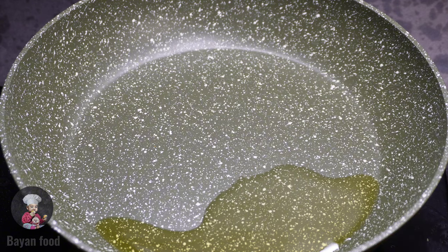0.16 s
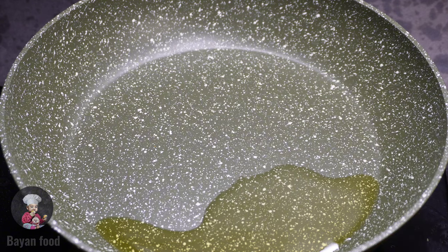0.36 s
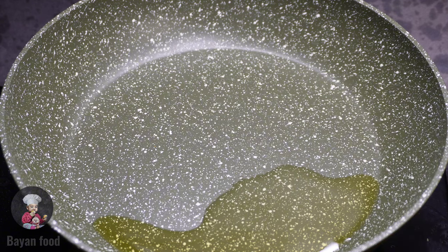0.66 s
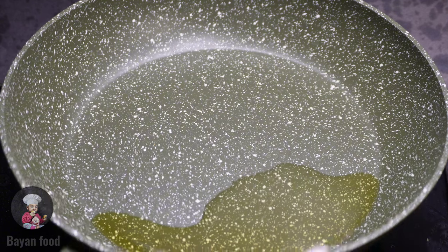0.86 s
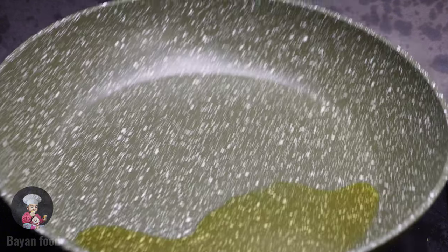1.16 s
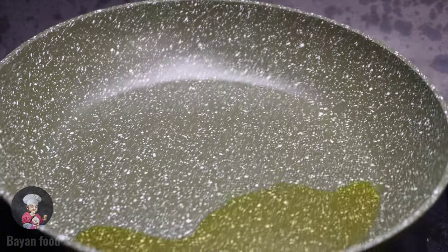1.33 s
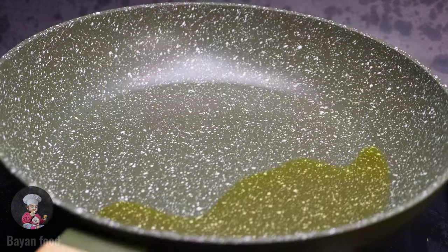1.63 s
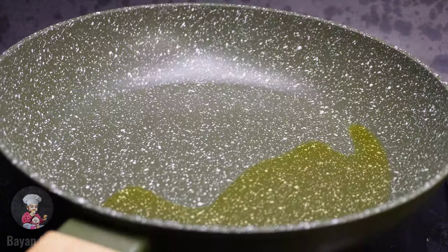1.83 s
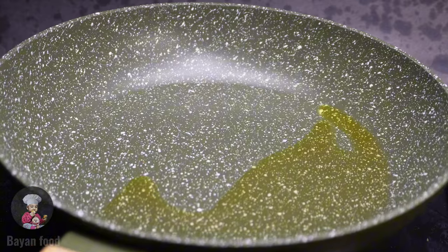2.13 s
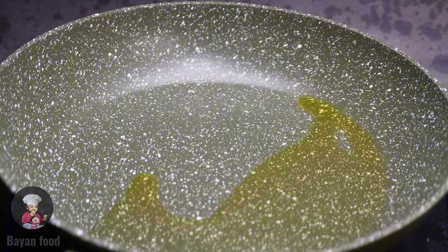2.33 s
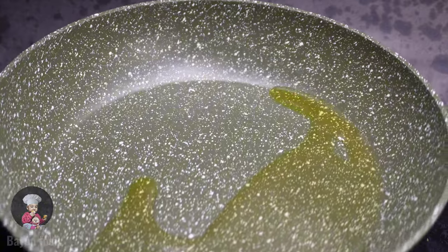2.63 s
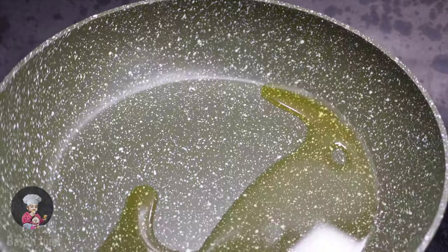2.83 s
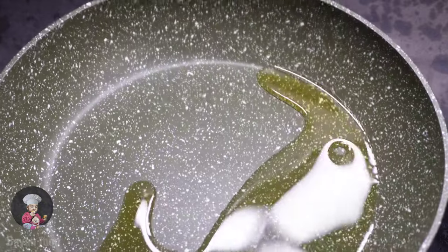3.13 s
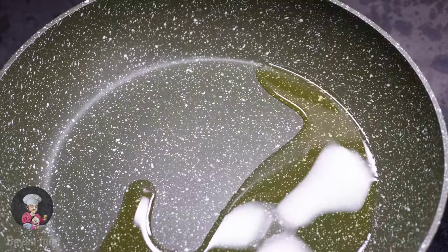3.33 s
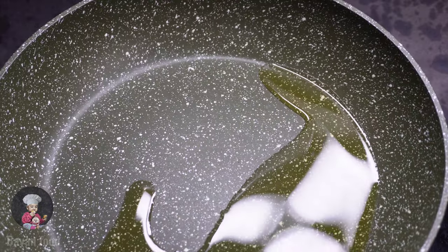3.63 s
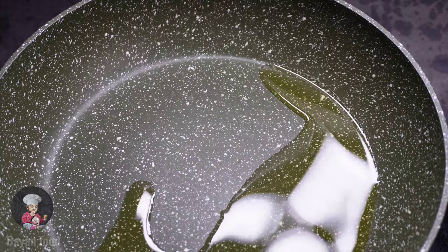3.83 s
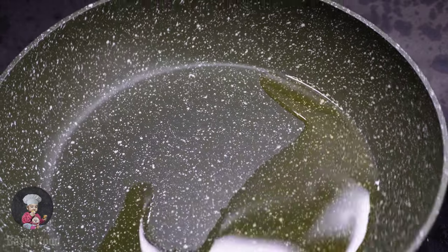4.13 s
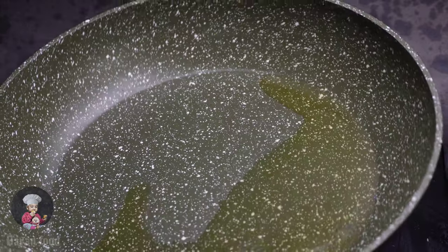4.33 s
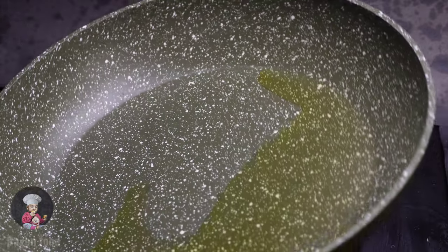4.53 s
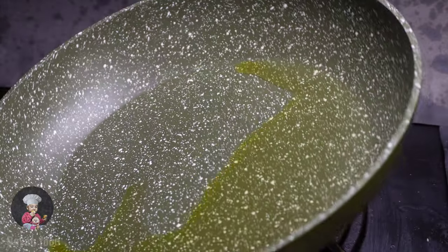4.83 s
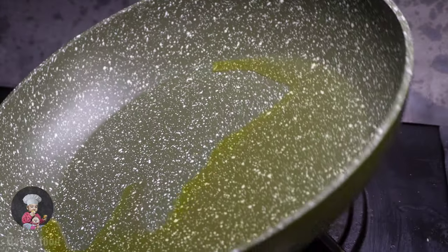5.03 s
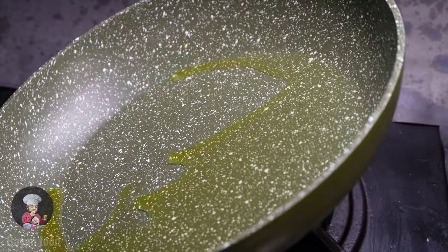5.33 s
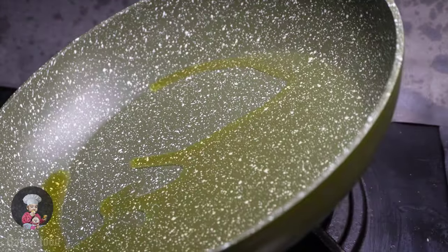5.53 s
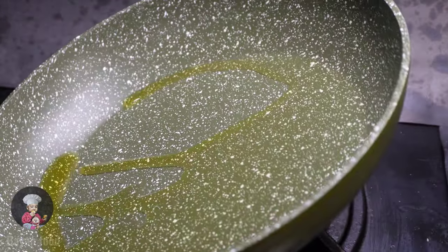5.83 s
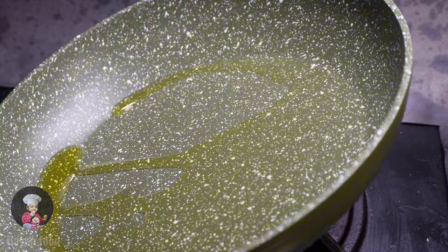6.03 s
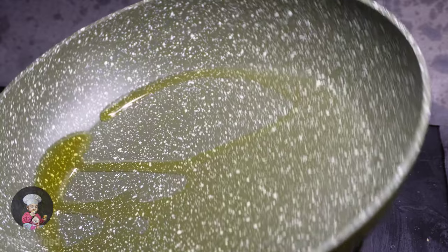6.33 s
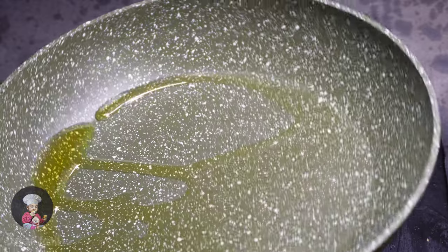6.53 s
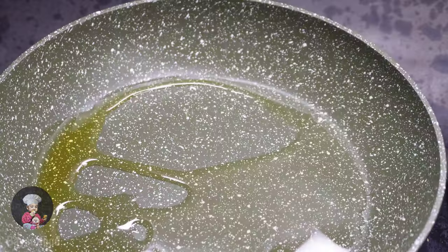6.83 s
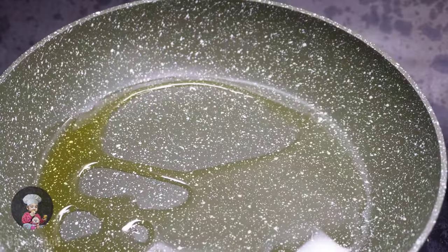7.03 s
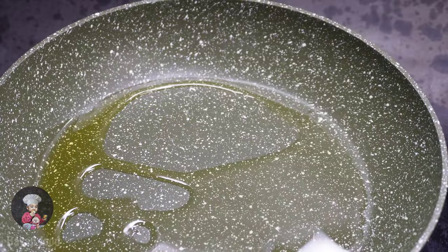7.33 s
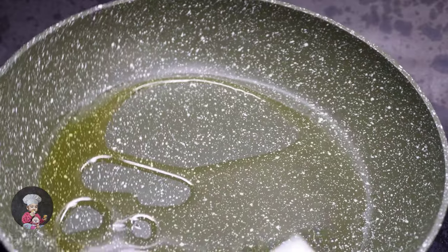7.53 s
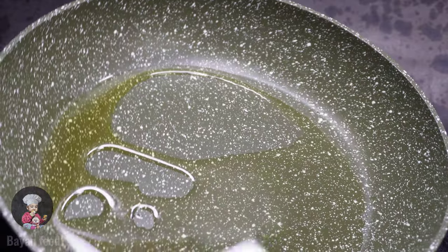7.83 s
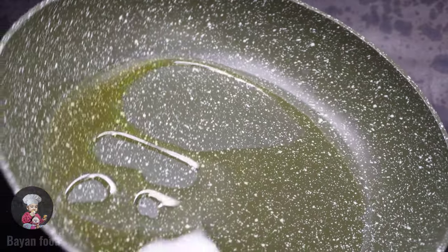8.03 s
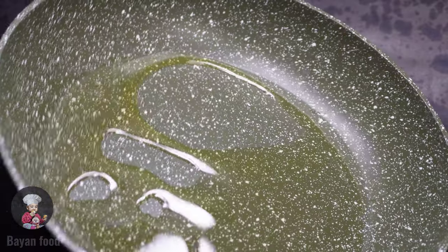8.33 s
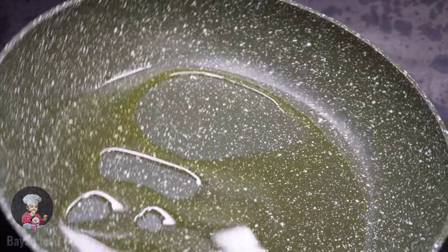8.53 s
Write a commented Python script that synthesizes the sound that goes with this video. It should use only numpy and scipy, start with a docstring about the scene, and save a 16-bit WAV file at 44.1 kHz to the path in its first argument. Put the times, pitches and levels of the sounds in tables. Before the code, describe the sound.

A gas burner hisses throughout in a small kitchen, with a low fluttering flame rumble, a little quieter during the first second, and a very faint hum. In the first 0.4 s, several light hard clicks sound over a dull hand rub. Around 0.9-1.3 s a frying pan drags across the iron grate with a dense metallic scrape and a few knocks as it is lifted; the hiss shifts slightly. At 2.9 s it lands with a strong double clank, short ringing and grate rattle, followed by duller knocks at 3.1 and 3.2 s. Tiny clicks come at 3.6-4 s, a soft low knock at 4.4 s, then a lift with faint soft rubbing around 5-6 s. At 6.8 s the pan clatters down brightly in rapid bounces with a slight scrape. A single knock follows at 7.5 s, and a thin high whistle briefly appears around 8-8.5 s. Close, with short wall echoes.

```python
"""Light clicks and a dull rub of the hand come first, over a hissing, rumbling gas burner in a small kitchen.
Then a frying pan with oil is dragged over the iron grate, lifted, tilted and set down twice.
Each contact rings the pan, as fading sine tones, and rattles the grate and hob top, as fading noise.
The drag is a dense rain of tiny jolts through the same pan tones; gas, flame and rubbing are filtered noise.
A faint hum lies beneath, and a thin whistle comes once near the end."""
import sys
import numpy as np
from scipy import signal
from scipy.fft import rfft, irfft, next_fast_len
from scipy.io import wavfile
from scipy.ndimage import map_coordinates

SR = 44100
rng = np.random.default_rng(int(sys.argv[2]) if len(sys.argv) > 2 else 0)


def to_wav(sig):
    """Store sig (one row per channel, or 1-D mono) as 16-bit WAV at the path in sys.argv[1].

    Samples outside -1..1 are clipped; the rate is SR.
    """
    pcm = np.clip(np.atleast_2d(sig), -1, 1) * 32767
    pcm = np.round(pcm).astype(np.int16)
    wavfile.write(sys.argv[1], SR, pcm.T)  # frames by channels


N = 382347  # length in samples
T = np.arange(N) / SR  # time in s
RING_T = T[:SR // 2]  # the half second in which a ring dies away


def undb(db):
    """Turn dB into a plain gain."""
    return 10 ** (np.asarray(db) / 20)


def unit(x):
    """Scale to rms 1."""
    return x / np.sqrt(np.mean(x ** 2))


def colour(x, gain):
    """Filter by a gain that is a function of frequency."""
    size = next_fast_len(x.shape[-1])
    hz = np.arange(size // 2 + 1) * SR / size + 0.00092  # just above 0, so its logarithm exists
    return irfft(rfft(x, size) * gain(hz), size)[..., :x.shape[-1]]


def along(hz, table, axis=1):
    """Read a column of a table on a log-frequency axis."""
    table = np.array(table)
    return np.interp(np.log(hz), np.log(table[:, 0]), table[:, axis])


def butter(x, hz, kind, order=2):
    """Smooth low, high or band filter."""
    corner = np.clip(hz, 10, .48 * SR)
    return signal.sosfilt(signal.butter(order, corner, kind, fs=SR, output="sos"), x)


def band(x, hz, width_hz):
    """One resonance, gain 1 at its centre."""
    return signal.lfilter(*signal.iirpeak(hz, hz / width_hz, fs=SR), x)


def walk(rate_hz):
    """Random wandering with spread 1; a higher rate wanders faster."""
    return unit(colour(rng.standard_normal(N), lambda f: np.exp(-(f / rate_hz) ** 2)))


SWELL_DB = 32  # rise over one attack time, fall over one release time


def swell(t, start, attack, hold, release):
    """Gain that rises and falls evenly in dB around a hold at 1."""
    short_of_top = np.maximum((start + attack - t) / attack, (t - start - attack - hold) / release)
    return undb(-SWELL_DB * np.clip(short_of_top, 0, 10))


def dying_noise(table):
    """Countless overlapping rings: third-octave bands, each with its own decay; energy 1."""
    out = 0
    for hz in 40 * 2 ** (np.arange(27) / 3):
        edges_hz = hz * 2 ** (np.array([-1, 1]) / 6)
        ring = butter(rng.standard_normal(len(RING_T)), edges_hz, "bandpass")
        fall_db = 60 * RING_T / along(hz, table, axis=2)
        out = out + ring * undb(along(hz, table) - fall_db)
    return out / np.linalg.norm(out)


def add(out, s, sound, db):
    """Mix in a blow whose first 20 ms have the given level."""
    start = int(s * SR)
    sound = sound * undb(db) / np.sqrt(np.mean(sound[:SR // 50] ** 2))
    out[start:start + len(sound)] += sound[:N - start]


# how much left and right differ, before each source's own side_db: pitch_hz, side_minus_mid_db
STEREO_WIDTH = [(60, -31), (200, -19.5), (700, -12.5), (2400, -12.5), (4400, -12), (8000, -6.5),
                (15000, -3)]


def pair(mid, side, side_db):
    """Left and right from a shared sound and a difference added to one and taken from the other."""
    side = colour(side, lambda f: undb(along(f, STEREO_WIDTH) + side_db))
    return np.array([mid + side, mid - side])


def spread(x, side_db):
    """Two close microphones: near reflections reach them differently, most of all in the treble."""
    # a 3.5 ms delay whose phase ripples with pitch
    echoes = colour(x, lambda f: np.exp(-2j * np.pi * f * .0035 + 2j * np.sin(f / 130)))
    return pair(x, echoes, side_db)


# echo of the kitchen walls, levels relative: pitch_hz, level_db_per_hz, t60_s (time to fall by 60 dB)
KITCHEN_WALLS = [(60, -5, 0.2), (400, 7, 0.38), (1480, 2.5, 0.52), (3000, -1, 0.5), (7000, 3, 0.25),
                 (15000, 0.5, 0.72)]


def kitchen_walls(sent):
    """Many wall reflections blur into a fading noise that builds up within a few milliseconds."""
    build_up = 1 - np.exp(-RING_T / 0.0013)
    return signal.fftconvolve(sent, dying_noise(KITCHEN_WALLS) * build_up)[:N]


# steady low tones: pitch_hz, level_db (rms)
HUM_TONES = [(48.4, -64), (96.9, -58.5)]


def hum():
    """Low sine tones whose phase wavers a little."""
    tones = 0
    for hz, db in HUM_TONES:
        phase = 2 * np.pi * hz * T + 0.097 * walk(4.7)
        tones = tones + undb(db) * np.sqrt(2) * np.sin(phase)
    return tones


# when a thin whistle comes and goes in the gas flow: start_s, attack_s, hold_s, release_s
WHISTLE_TIMING = (7.9, .17, .35, .13)


def whistle(hz=7750, width_hz=90, db=-67):
    """One narrow, airy resonance of the burner, driven by noise."""
    air = band(band(rng.standard_normal(N), hz, width_hz), hz, width_hz)
    return unit(air) * undb(db) * swell(T, *WHISTLE_TIMING)


LIFT_MOVE_S = 0.56  # time to raise or lower the pan; the opening balance changes as gradually


def raised(start, end):
    """0 to 1 and back in smooth moves; halfway at start and end."""
    return np.clip(np.minimum(T - start, end - T) / LIFT_MOVE_S + .5, 0, 1)


# gas hiss resonances, levels relative: pitch_hz, width_hz (nominal, for each of two passes), level_db
GAS_JET = [(1477, 129, -1.5), (3103, 174, 1), (3944, 390, -12), (4680, 38, -14.5), (5267, 139, -6),
           (6026, 97, -9.5), (6820, 42, -13), (7210, 300, -21), (7800, 300, -34), (9020, 190, -22.5),
           (10800, 310, -28.5), (11750, 120, -32.5), (13520, 130, -37)]
# flame noise, levels relative: pitch_hz, level_db_per_hz
FLAME_ROAR = [(20, -22), (36, -4), (55, 5), (80, -5.5), (160, 3), (290, -1.5), (480, -9.5), (1100, -13.5),
              (1700, -13.5), (2500, -22), (4500, -27), (7000, -28.5), (10000, -36.5), (15500, -42.5)]
# the pan is raised off the burner: start_s, end_s, extra_db of the second hiss resonance
PAN_LIFTS = [(1.103, 2.855, 5.5), (4.686, 6.8, 2)]
# a raised pan weakens the lowest resonance and frees the flame
LIFT_LOW_RING_DB, LIFT_FLAME_DB = -2.5, 2
# at first the flame noise and lowest hiss resonance are quieter, the second slightly louder
OPENING_UNTIL_S, OPENING_FLAME_DB, OPENING_LOW_RING_DB, OPENING_MAIN_RING_DB = 0.98, -6, -5.5, 2


def burner(hiss_db=-49, main_db=-6, upper_db=-1.5, roar_db=-48.5, flutter_db=1.2):
    """Gas hisses through the burner's resonances and the flame rumbles; lifting the pan alters both."""
    lifted = sum(raised(start, end) for start, end, _ in PAN_LIFTS)
    opening = 1 - raised(OPENING_UNTIL_S, np.inf)
    low_ring_db = LIFT_LOW_RING_DB * lifted + OPENING_LOW_RING_DB * opening
    lift_extra_db = sum(db * raised(start, end) for start, end, db in PAN_LIFTS)
    main_ring_db = main_db + lift_extra_db + OPENING_MAIN_RING_DB * opening
    flame_db = LIFT_FLAME_DB * lifted + OPENING_FLAME_DB * opening
    gas = rng.standard_normal(N)
    rings = []
    for hz, width, db in GAS_JET:
        rings.append(undb(db) * band(band(gas, hz, 1.04 * width), hz, 1.09 * width))
    upper_gain = undb(upper_db + 0.95 * walk(1.0))
    hiss = undb(low_ring_db) * rings[0] + undb(main_ring_db) * rings[1] + upper_gain * sum(rings[2:])
    # the resonances wander slightly in pitch
    positions = np.cumsum(1 + .005 * walk(.8))
    hiss = map_coordinates(hiss, [positions], order=3, mode="reflect")
    roar = unit(colour(rng.standard_normal(N), lambda f: undb(along(f, FLAME_ROAR))))
    # the low flame noise flutters
    flame_gain = undb(flame_db + flutter_db * walk(6.5))
    roar = roar + (flame_gain - 1) * band(roar, 246, 610)
    return hiss / np.std(sum(rings)) * undb(hiss_db) + undb(roar_db) * roar


# hand rubbing and shifting on the handle: start_s, attack_s, hold_s, release_s, level_db, centre_hz
HANDLE_RUBS = [(0, .17, 0.13, 0.94, -46.5, 120), (.38, 0.166, 0.028, 0.9, -56.5, 6200),
               (5.0, 0.65, 0.059, 0.57, -52, 3380)]


def rubbing(width=0.64, uneven_db=2.5):
    """Faint uneven friction on the handle: a dull rumble or a soft hiss that swells and fades."""
    noise = rng.standard_normal(N)
    strokes = 0
    for *timing, db, hz in HANDLE_RUBS:
        friction = band(band(noise, hz, width * hz), hz, width * hz)
        strokes = strokes + unit(friction) * undb(db) * swell(T, *timing)
    return strokes * undb(uneven_db * walk(25))


# a small hard part, levels relative: pitch_hz, level_db_per_hz, t60_s (before the click's own damping)
HARD_SNAP = [(100, 21, 0.11), (490, 5, 0.35), (1404, -3, 0.23), (2960, 11, 0.053), (4970, 3, 0.13),
             (7800, 2, 0.056), (15200, -12.5, 0.091)]
# its resonances, added on top: pitch_hz, width_hz, added_db
HARD_SNAP_RINGS = [(486, 140, 12.5), (1160, 290, 9.5), (1440, 230, 14), (2433, 460, 1), (3130, 180, 2.5),
                   (4040, 120, -10), (6250, 2200, -1)]
# light handling clicks: start_s, level_db, centre_hz, damping_s (time to fall to about a third)
HANDLING_CLICKS = [(.029, -44, 2500, 0.11), (0.147, -40, 4000, 0.046), (0.162, -22, 2030, 0.17),
                   (.260, -35, 5350, .08), (.372, -32.5, 5230, 0.038), (0.3798, -27.5, 2270, 0.32),
                   (1.315, -48, 3500, 0.0108), (3.601, -49, 3260, 0.033), (3.803, -51, 4100, 0.0037),
                   (3.863, -46.5, 4630, 0.0043), (3.955, -33, 3300, 0.02), (6.999, -51, 4970, 0.0059)]
CLICK_SPAN = 1.8  # a click reaches this factor below and above its centre


def clicks():
    """Small hard snaps: quickly damped noise with a few short resonances."""
    out = np.zeros(N)
    for s, db, centre_hz, damping_s in HANDLING_CLICKS:
        snap = dying_noise(HARD_SNAP) * np.exp(-RING_T / damping_s)
        snap = snap + sum(undb(ring_db) * band(snap, hz, width) for hz, width, ring_db in HARD_SNAP_RINGS)
        snap = butter(snap, centre_hz / CLICK_SPAN, "highpass")
        add(out, s, butter(snap, centre_hz * CLICK_SPAN, "lowpass", order=1), db)
    return out


# tones of the pan resting on the hob, levels relative: pitch_hz, struck_db, rubbed_db,
# t60_s (before each contact's length share)
PAN_MODES = [(107, -12.5, -18, 0.21), (151.4, -9.5, -8, 0.39), (196, -17.5, -15, 0.66),
             (285.7, -9.5, -6.5, 0.38), (380, -15.5, -17, 0.26), (535, -11.5, -15, 0.2),
             (659, -15, 4, 0.158), (741, -10.5, 0, 0.22), (796, -10.5, 0.5, 0.061), (924, -4, 10.5, 0.1),
             (953, -1, -5, 0.12), (1048, -2, -6, 0.16), (1227, -3.5, -19, 0.29), (1270, -45, -9, 0.1),
             (1434, -0.5, -9, 0.18), (1553, -10, -10, 0.27), (1933, -1, 8.5, 0.14), (1972, -3.5, -5, 0.27),
             (2094, -2, -21, 0.187), (2468, -10, -5, 0.2), (2867, -1, 4.5, 0.11), (3040, -14, -31, 0.23),
             (3996, -17, -4, 0.22), (4490, -11.5, -13, 0.24), (5200, -7, -8, 0.29), (5530, 2.5, -3, 0.11),
             (5770, -19, -10, 0.078), (6420, -12, -6, 0.16), (7100, -18, -18, .16),
             (7570, -30, -10.5, 0.17)]


def pan_modes(db, length, scatter_db, detune):
    """The pan's modes after one tap, energy 1; every contact point weights them anew."""
    hz, _, _, t60 = np.transpose(PAN_MODES)[:, :, None]
    size, shift, sign = rng.standard_normal((len(hz), 3)).T[:, :, None]
    decay = undb(db[:, None] + scatter_db * size - 60 * RING_T / (t60 * length))
    tones = np.sin(2 * np.pi * hz * (1 + detune * shift) * RING_T)
    modes = np.sum(np.sign(sign) * decay * tones, axis=0)
    return modes / np.linalg.norm(modes)


# grit between pan and grate, levels relative: pitch_hz, level_db_per_hz
GRIT = [(40, -40), (85, -25), (150, -16), (280, 0), (450, -2), (700, 4.5), (1400, 0), (2200, -11),
        (4500, -11.5), (7500, -21.5), (10000, -24), (15000, -51)]
# pan sliding on the grate: start_s, attack_s, hold_s, release_s, level_db (before the treble change),
# treble_db, grit_db (against the ring)
PAN_DRAGS = [(.915, .19, 0.0958, 0.13, -20.5, -2.5, -1.5), (6.834, 0.037, 0.082, 0.084, -46, 6.5, 6.5)]
SAG_OCTAVES_PER_S = .15  # the rings sink as the support points move


def drags(slip_rate=2200, slip_db=3.0, catch_db=0.5, grit_s=0.0067, dull_hz=1500):
    """Dense stick-slip jolts, slip_rate a second, ring the pan and stir the grit on the iron."""
    out, rubbed_db = np.zeros(N), np.array(PAN_MODES)[:, 2]
    catching = undb(catch_db * walk(95))  # the base catches and lets go
    for s, attack, hold, release, db, treble_db, grit_db in PAN_DRAGS:
        start = int(s * SR)
        span = slice(start, start + len(RING_T))
        t = T[span]
        jolts = rng.random(len(t)) < slip_rate / SR
        slips = jolts * undb(slip_db * rng.standard_normal(len(t))) * catching[span]
        slips = slips - slips.mean()
        tap = pan_modes(rubbed_db, length=0.61, scatter_db=2.0, detune=0.00017)
        ring = signal.fftconvolve(slips, tap)[:len(t)]
        # play the ring ever more slowly, so its pitch sinks
        shift = SAG_OCTAVES_PER_S * (s + attack + hold / 2 - t)
        ring = map_coordinates(ring, [np.cumsum(2 ** shift)], order=3)
        burst = rng.standard_normal(len(t)) * np.exp(-RING_T / grit_s)
        grit = colour(signal.fftconvolve(slips, burst)[:len(t)], lambda f: undb(along(f, GRIT)))
        sound = unit(ring) + undb(grit_db) * unit(grit * catching[span])
        # a lighter contact lets more treble through
        dull = butter(sound, dull_hz, "lowpass", order=1)
        sound = dull + undb(treble_db) * (sound - dull)
        out[span] += sound * undb(db) * swell(t, s, attack, hold, release)
    return out


# the pan chatters in its second setting down: first bounce, time between bounces, level, loss per bounce
CHATTER_S, BOUNCE_S, CHATTER_DB, BOUNCE_LOSS_DB = 6.790, .012, -21.5, 0.5


def chatter(corner_hz=4200, thud_db=3.5, length=0.84, favoured_hz=1450, favoured_db=2.0, count=3):
    """Quick bounces on the grate, each weaker than the last, as further knocks."""
    bounces = []
    for k in range(count):
        s, db = CHATTER_S + k * BOUNCE_S, CHATTER_DB - k * BOUNCE_LOSS_DB
        bounces.append((s, db, corner_hz, thud_db, length, favoured_hz, favoured_db))
    return bounces


# dense short rings of grate and hob top, levels relative: pitch_hz, level_db_per_hz, t60_s
GRATE_RATTLE = [(40, -39, 0.17), (91, 7.5, 0.92), (148, -31, 0.6), (297, -2.5, 0.31), (480, -3, 0.29),
                (940, -7.5, 0.069), (1380, 9, 0.12), (1570, -1.5, 0.04), (2016, 1, 0.27), (2620, 1, 0.066),
                (4050, -6.5, 0.26), (5480, -8.5, 0.19), (7850, -17, 0.36), (15400, -30, 0.087)]
# pan on the grate: start_s, level_db, contact_corner_hz (softer contacts lower), hob_top_thud_db,
# ring_length_share, favoured_pitch_hz, favoured_db
PAN_KNOCKS = [(1.028, -29.5, 2500, 9.5, 0.7, 930, 14.5), (1.091, -24, 2000, -10, 0.8, 686, 19),
              (1.198, -26.5, 2000, 9.5, 1, 1980, -5), (2.8868, -17.5, 2190, 4, 0.69, 2010, 5.5),
              (2.9051, -14.5, 3000, 7, 0.72, 1250, 5), (3.1069, -27.5, 2100, 9, 1, 1240, 8.5),
              (3.2406, -28, 1800, 16.5, 0.32, 1460, 12.5), (4.4201, -32.5, 1000, 4.5, 0.36, 820, 19),
              (6.776, -14.5, 6740, -2.5, 1, 1970, 1), (6.8304, -16.5, 2260, 3, 0.2, 1090, 11.5),
              (6.845, -23, 2010, 5, 1, 1490, 5.5), (7.521, -20.5, 2780, 7.5, 0.43, 860, 9.5)]
FAVOURED_WIDTH = 0.24  # share of the favoured pitch


def knocks(pressed_db=-2.5, pressed_length=0.23, rattle_db=-3.5, crack=0.73, crack_s=0.0019, thud_hz=380):
    """Metal meets iron: a hard crack, then the ring; each knock has its own share of low hob-top thud."""
    out, struck_db = np.zeros(N), np.array(PAN_MODES)[:, 1]
    for s, db, corner_hz, thud_db, length, favoured_hz, favoured_db in PAN_KNOCKS + chatter():
        free = pan_modes(struck_db, length, scatter_db=-0.5, detune=0.0015)
        # while it presses on the grate the pan rings briefly and off pitch
        pressed = pan_modes(struck_db, pressed_length, scatter_db=1.2, detune=.011)
        ring = free + undb(pressed_db) * pressed + undb(rattle_db) * dying_noise(GRATE_RATTLE)
        ring = ring * (1 + crack * np.exp(-RING_T / crack_s))
        ring = ring + (undb(favoured_db) - 1) * band(ring, favoured_hz, FAVOURED_WIDTH * favoured_hz)
        # split at thud_hz; both halves of this crossover stay in phase
        thud = butter(butter(ring, thud_hz, "lowpass"), thud_hz, "lowpass")
        thud = butter(thud, 110, "highpass", order=3)
        bright = butter(butter(ring, thud_hz, "highpass"), thud_hz, "highpass")
        blow = undb(thud_db) * thud + bright
        blow = butter(blow, corner_hz, "lowpass", order=1)
        add(out, s, butter(blow, 2.0 * corner_hz, "lowpass", order=1), db)
    return out


def scene():
    """Pan and clicks close by, their echo from the walls, and the steady burner and rubbing around them."""
    pan, snaps = knocks() + drags(), clicks()
    sent = undb(-12) * snaps + undb(-16.0) * pan  # what the walls receive
    walls = [kitchen_walls(sent) for _ in range(2)]
    steady = [burner() + rubbing() for _ in range(2)]
    close = spread(pan, side_db=-7) + spread(snaps, side_db=-0.5)
    around = pair(*walls, side_db=-1.0) + pair(*steady, side_db=2.0)
    return close + around + hum() + whistle()


TOP_HZ = 15800  # nearly nothing is left above this


def record(dry):
    """The recorder rounds the highest peaks and cuts the top."""
    ceiling = .8
    rounded = ceiling * np.tanh(dry / ceiling)
    return signal.sosfilt(signal.ellip(8, .2, 70, TOP_HZ, fs=SR, output="sos"), rounded)


dry = scene()
out = record(dry)
to_wav(out)
```